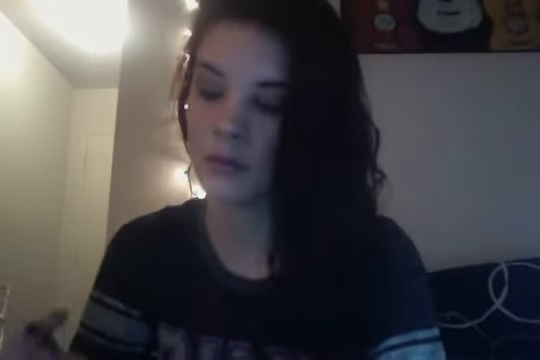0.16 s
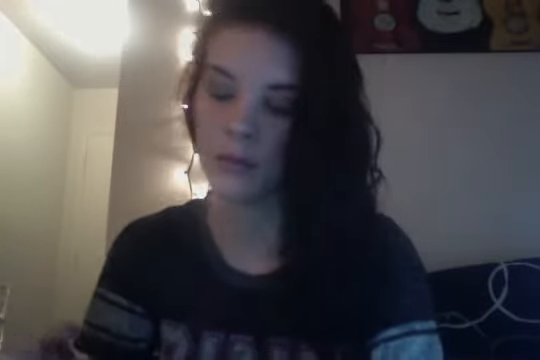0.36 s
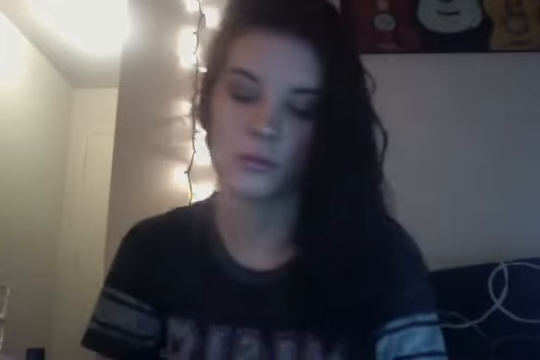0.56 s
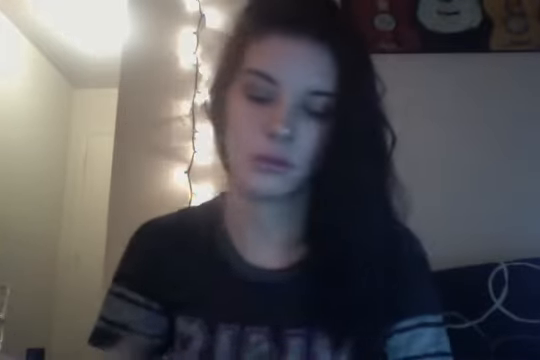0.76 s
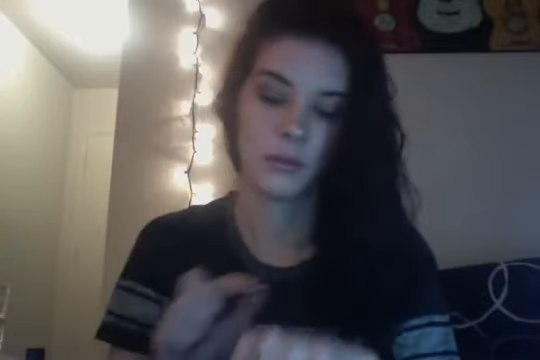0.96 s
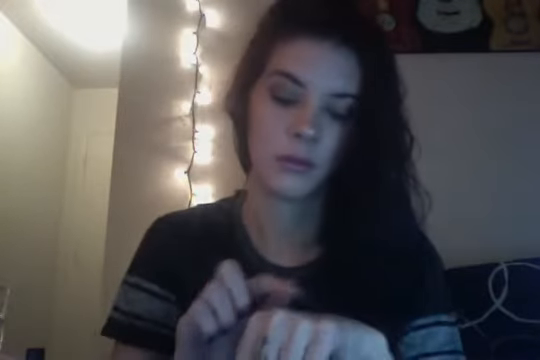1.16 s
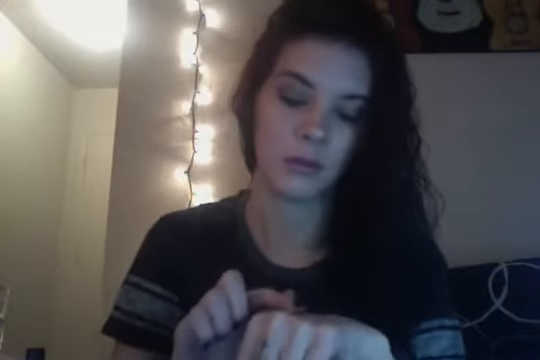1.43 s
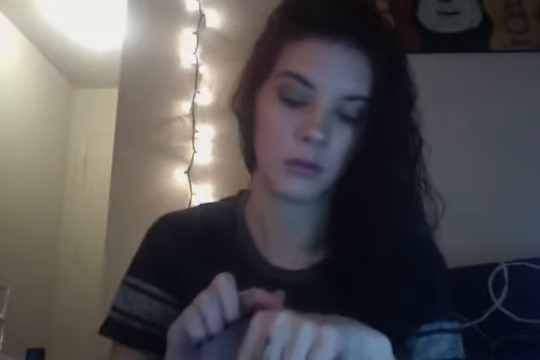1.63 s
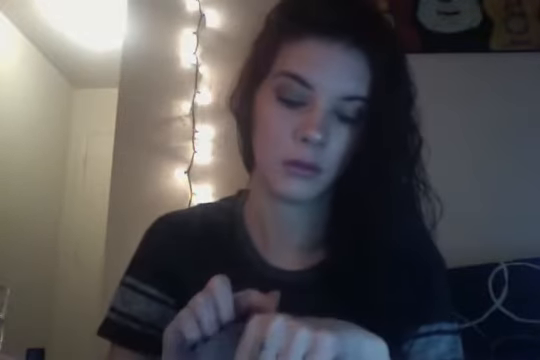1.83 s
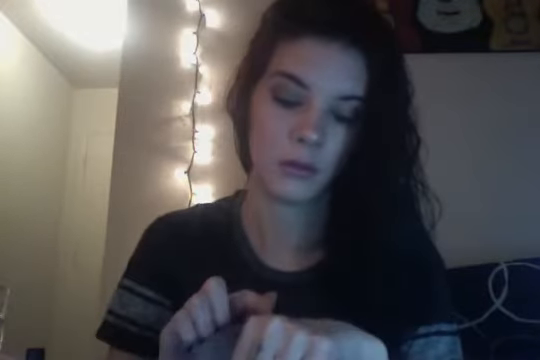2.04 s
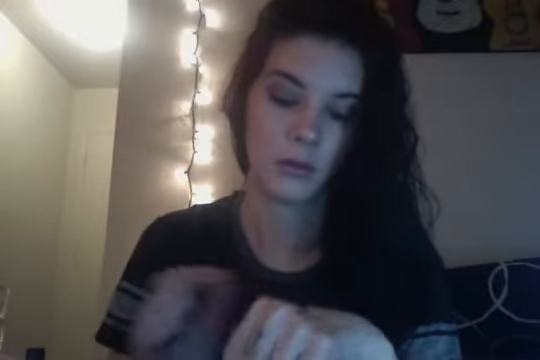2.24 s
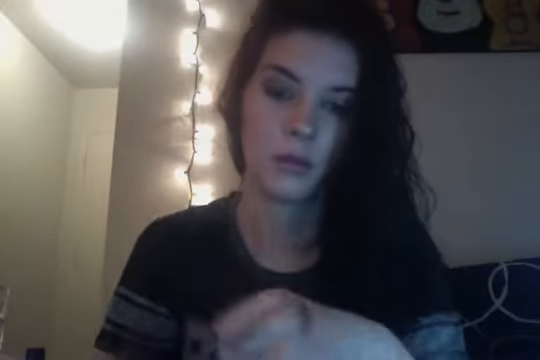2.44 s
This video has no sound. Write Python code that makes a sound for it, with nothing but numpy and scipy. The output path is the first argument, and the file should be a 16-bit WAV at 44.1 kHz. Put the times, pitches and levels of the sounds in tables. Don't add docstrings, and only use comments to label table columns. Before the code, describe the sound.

A plastic make-up palette is put down with a sharp clack and rattle, then snaps shut

```python
import sys
import numpy as np
from scipy import signal
from scipy.fft import rfft, irfft
from scipy.io import wavfile
from scipy.ndimage import uniform_filter1d

SR = 44100
rng = np.random.default_rng(int(sys.argv[2]) if len(sys.argv) > 2 else 0)


def ratio_of_db(decibels):
    return 10 ** (np.asarray(decibels, float) / 20)


def wav_record(signal):
    frames = np.transpose(np.atleast_2d(signal))
    bounded = np.clip(frames, -1, 1)
    quanta = np.round(bounded * 32767).astype(np.int16)
    wavfile.write(sys.argv[1], SR, quanta)


N = 114660

# (time [s], rate [Hz])
BLADE_RATE = [
    (0.0, 1424),
    (0.19, 1449),
    (1.12, 1453),
    (2.6, 1473),
]
FAN_TONES = {3: -78.5, 4: -85, 8: -79.5, 9: -79, 10: -85, 11: -83.5, 14: -89.5, 18: -88.5, 19: -78, 38: -85,
             57: -102}
# (frequency [Hz], level per Hz [dB])
AIR_COLOUR = [(45, -30), (90, -7), (650, 0), (1600, -7), (4000, -14), (4800, -24), (7000, -28.5),
              (16000, -45.5)]
BUZZ_TONES = {3: -104, 5: -92.5, 7: -101, 9: -106, 10: -101, 11: -96.5, 12: -102, 13: -100, 14: -91, 15:
              -102, 16: -107, 17: -104, 18: -101, 20: -107, 21: -118}
# (centre [Hz], width [Hz], level [dB])
SIZZLE = [(2270, 340, -87), (6000, 600, -97), (7700, 630, -96.5), (8350, 250, -99), (8850, 300, -97)]
# (time [s], level [dB], length [s])
BLIPS = [
    (1.16, -80, 0.018),
    (1.287, -84, .012),
    (2.28, -85, .015),
]

DROP = [(.2047, -49, -42, -70, 3.6), (.2074, -18.5, -4.5, -7, 0.69), (.2085, -11, -14.5, -25, 1.6),
        (.2213, -26, -13, -23.5, 1.3), (.2226, -15, -16.5, -27.5, 1.46), (.2310, -33.5, -19, -23, 1),
        (.2330, -21, -22.5, -34.5, 2.2), (.2350, -25, -23, -40, 1.5), (.2420, -30, -33.5, -41, 2.5),
        (.2465, -28.5, -35.5, -45.5, 3.0), (.2515, -33, -38, -44.5, 2.0), (.2590, -31, -40, -48, 2.24),
        (.2705, -37, -51, -54, 2.8), (.2755, -49, -39, -54, 1.9), (.2810, -44, -45, -59, 2.67),
        (.2960, -41, -46, -58, 2.94), (.3080, -48, -49, -54, 2.94), (.3200, -56, -50, -55, 2.83)]
RATTLE = [
    (.2183, -44.5, -35.5, -22.5, 2.7),
    (.2568, -40.5, -30.5, -37.5, 2.6),
    (.2632, -50, -48, -36.5, 2.1),
    (.2644, -46.5, -31, -24, 3.0),
    (.2880, -50, -41, -36.5, 3.41),
]
TICK = [
    (.3580, -47, -49.5, -57, 2.4),
    (.3598, -35.5, -32.5, -56, 2.22),
    (.3770, -60, -52, -60, 5.2),
    (.3900, -60.5, -57, -69, 5.7),
]
SNAP = [
    (.5195, -23, -21.5, -21, 0.96),
    (.5210, -19, -23, -36, 1.12),
    (.5255, -47, -32, -48, 1.14),
    (.5298, -43, -31, -47, 1.6),
    (.5325, -24, -36, -42, 2.4),
    (.5420, -46, -47, -56, 2.9),
    (.5700, -34.5, -54, -65, 3.1),
    (.5850, -49, -58, -72, 3.9),
]
SETTLE = [
    (.5465, -41, -46, -60, 3.3),
    (.5565, -34, -39, -60, 3.15),
    (.5655, -38, -44.5, -46, 3.3),
    (.5800, -50, -60, -70, 2.7),
]

TRAY = [(310, -18, .03), (467, -7, .03), (567, -7.5, .022), (784, 7, 0.018), (1070, -14, .012)]
SHELL = [(1560, -11, .012), (1836, -6.5, 0.014), (2375, -5, .012), (2750, -9, 0.014), (3173, -6.5, .01),
         (3560, 0, .01), (4300, -4, 0.0079), (4600, -10.5, .007)]
CRACK = [(5850, -7.5, 0.0083), (7660, -3.5, .007), (8560, -4, 0.013), (9300, 4.5, .006), (10300, 0, .005),
         (11600, -4.5, 0.0074), (12600, -9, 0.006), (13600, -13.5, .004)]
PAN_SHELL = [(2000, -1, 0.016), (2650, -7.5, .008), (3470, -1, .01), (4900, -2, 0.0087)]
PAN_CRACK = [(5920, -5, .006), (6700, 2, 0.011), (8400, -5.5, .005), (10400, -0.5, .008),
             (11600, -2, 0.0081), (13300, -9, .004), (14800, -14.5, .003)]
TICK_TRAY = [(410, -4.5, 0.025), (570, 4.5, 0.0091), (720, 5, 0.012), (1000, -12, 0.014)]
TICK_SHELL = [(1870, -1.5, 0.016), (2270, -6.5, 0.015), (3200, -5.5, 0.015), (4640, -23, .025)]
TICK_CRACK = [(6030, 4, 0.015), (10800, 0, 0.019), (13500, -12, .012)]
LID_TRAY = [(250, -11, 0.036), (412, -5, 0.029), (473, -1.5, 0.017), (656, -8.5, 0.011), (810, -4.5, .015),
            (1030, -15, 0.016)]
LID_SHELL = [(1360, -4.5, 0.015), (1620, 3, 0.015), (2170, 2.5, 0.013), (2630, -10.5, 0.0076),
             (3240, -9.5, 0.01), (3870, -8, 0.0042), (4620, -7.5, 0.011)]
LID_CRACK = [(5900, -0.5, 0.011), (6610, 1.5, 0.0094), (7600, -3, 0.0055), (8280, -1.5, 0.0055),
             (9450, -14, 0.0025), (11200, -6, 0.0044), (12300, -9, .003), (14200, -11, .003)]

GRIT_SHARE = (0.055, 0.12, 0.45)
# (centre [Hz], width [Hz])
CLACK_BANDS = [(600, 500), (3200, 3000), (6000, 5700)]
# (tray, shell, edges) [dB]
CLACK_DB = (-29.5, -11, -5.5)
# (frequency [Hz], level [dB], time to fall 60 dB [s])
ROOM = [(113, -31, 0.19), (309.7, -27, 0.11), (800, -27, .2), (1520, -22.5, .2), (3006, -24, .2),
        (5660, -19.5, .21), (11000, -20, .18)]
# (time [s], gain [dB])
SUPPRESSOR = [
    (0, 0.5),
    (.2, 0),
    (0.239, 8),
    (.6, 7),
    (.95, 3.5),
    (1.2, -0.36),
    (2.6, 0.5),
]

BLADES = 19
FAN_WOBBLE_DB, FAN_WOBBLE_RATE, FAN_DRIFT = 2.5, 22, .0007
AIR_DB, AIR_FLICKER_DB = -69.5, 1
BUZZ_HZ, CLOCK_HZ, MAINS_HZ = 567.45, 8000, 120
CLOCK_DB, CLOCK_FLUTTER_DB, MAINS_DB = -91.5, 8.5, -87
SKIRT_DB, SKIRT_HZ = -102, 79.67
CLOCK_FADE_S, CLOCK_FADE_DB = 2.4, -14
SIZZLE_PATCH_DB = 3
SCATTER_DB, SCATTER_TUNE, SCATTER_PHASE = 2.5, 0.014, .35
STRIKE_SAMPLES = 4096
ROOM_GAP_S = 0.006
BODY_CUT_HZ, BODY_TOP_HZ = 220, 14000
LOW_CUT_HZ, TOP_HZ = 87, 15900


def band(x, hz, width):
    return signal.lfilter(*signal.iirpeak(min(hz, .45 * SR), hz / width, fs=SR), x)


def double_band(x, hz, width):
    return band(band(x, hz, width), hz, width)


def level(x, db):
    return x * ratio_of_db(db) / np.sqrt(np.mean(x ** 2))


def peak(x, db=0):
    return x * ratio_of_db(db) / np.abs(x).max()


def walk(rate):
    hold = int(SR / rate)
    steps = np.repeat(rng.standard_normal(64), hold)[:N + hold]
    smooth = uniform_filter1d(uniform_filter1d(steps, hold), hold)
    return 1.17 * smooth[:N]


def fan():
    t = np.arange(N) / SR
    shaft_hz = np.interp(t, *np.array(BLADE_RATE).T) / BLADES * (1 + FAN_DRIFT * walk(24))
    turns = np.cumsum(shaft_hz) / SR
    tones = 0
    for multiple, db in FAN_TONES.items():
        wobble = ratio_of_db(FAN_WOBBLE_DB * walk(FAN_WOBBLE_RATE))
        tone = np.sin(2 * np.pi * (multiple * turns + rng.random()))
        tones = tones + level(wobble * tone, db)

    hz, db = np.array(AIR_COLOUR).T
    f = np.fft.rfftfreq(N, 1 / SR) + 1
    colour = ratio_of_db(np.interp(np.log(f), np.log(hz), db))
    air = 0
    for centre in 2 ** np.arange(5.5, 14.5):
        share = np.cos(np.pi / 2 * np.clip(np.log2(f / centre), -1, 1))
        octave = irfft(rfft(rng.standard_normal(N)) * colour * share, N)
        air = air + ratio_of_db(AIR_FLICKER_DB * walk(8.3)) * octave
    return tones + level(air, AIR_DB)


def circuit_tone(hz, db, flutter_db=1.5):
    t = np.arange(N) / SR
    tone = np.sin(2 * np.pi * (hz * t + rng.random()))
    return level(ratio_of_db(flutter_db * walk(24)) * tone, db)


def circuits():
    t = np.arange(N) / SR
    buzz = sum(circuit_tone(multiple * BUZZ_HZ, db) for multiple, db in BUZZ_TONES.items())
    whine = circuit_tone(CLOCK_HZ, CLOCK_DB, CLOCK_FLUTTER_DB)
    skirt = level(band(rng.standard_normal(N), CLOCK_HZ, SKIRT_HZ), SKIRT_DB)
    fade = ratio_of_db(CLOCK_FADE_DB * np.clip((t - CLOCK_FADE_S) * 10, 0, 1))
    clock = (whine + skirt) * fade
    sizzle = 0
    for hz, width, db in SIZZLE:
        hiss = double_band(rng.standard_normal(N), hz, width)
        sizzle = sizzle + level(ratio_of_db(SIZZLE_PATCH_DB * walk(22)) * hiss, db)
    burst = level(double_band(rng.standard_normal(N), 8550, 700), 0)
    swells = sum(ratio_of_db(db) * np.exp(-((t - when) / (length / 2)) ** 2) for when, db, length in BLIPS)
    return buzz + clock + sizzle + swells * burst + circuit_tone(MAINS_HZ, MAINS_DB)


def ring_part(modes, push, grit, ms, rough):
    t = np.arange(STRIKE_SAMPLES) / SR
    clean = scrape = 0
    for hz, db, t60 in modes:
        louder, higher, shift = rng.standard_normal(3)
        turn = 2j * np.pi * hz * (1 + SCATTER_TUNE * higher)
        fade = 1000. ** (-1 / t60 / SR)
        swell = signal.lfilter([1], [1, -fade], push)
        wave = np.exp(turn * (t - ms / 2 / 1000) + 1j * SCATTER_PHASE * shift).real
        clean = clean + ratio_of_db(db + SCATTER_DB * louder) * swell * wave
        scrape = scrape + ratio_of_db(db) * signal.lfilter([1], [1, -fade * np.exp(turn / SR)], grit).imag
    return (1 - rough) * peak(clean) + rough * peak(scrape)


def knocks(contacts, *parts, soft_db=0):
    out = np.zeros((2, N))
    t = np.arange(STRIKE_SAMPLES) / SR
    for when, *dbs, ms in contacts:
        push = np.sin(np.pi * np.clip(t / (ms / 1000), 0, 1)) ** 2
        grit = push * rng.standard_normal(STRIKE_SAMPLES)
        start = int(when * SR)
        for i, (modes, db) in enumerate(zip(parts, dbs)):
            ring = peak(ring_part(modes, push, grit, ms, GRIT_SHARE[i]), db)
            clack = double_band(grit, *CLACK_BANDS[i])
            clack = ratio_of_db(soft_db) * clack * np.sqrt(np.sum(ring ** 2) / np.sum(clack ** 2))
            direct = ring + ratio_of_db(CLACK_DB[i]) * clack
            to_room = ring if i == 0 else clack
            out[:, start:start + STRIKE_SAMPLES] += [direct, to_room]
    return out


def room(x):
    t = np.arange(SR // 2) / SR
    tail = 0
    for hz, db, t60 in ROOM:
        noise = double_band(rng.standard_normal(len(t)), hz, hz)
        first_echo = np.clip(t / ROOM_GAP_S - 1, 0, 1)
        part = noise * 1000. ** (-t / t60) * first_echo
        tail = tail + ratio_of_db(db) * part / np.sqrt(np.sum(part ** 2))
    return signal.fftconvolve(x, tail)[:N]


def scene():
    gain = ratio_of_db(np.interp(np.arange(N) / SR, *np.array(SUPPRESSOR).T))
    laptop = gain * (fan() + circuits())

    hits = knocks(DROP, TRAY, SHELL, CRACK)
    hits += knocks(RATTLE, TRAY, PAN_SHELL, PAN_CRACK)
    hits += knocks(TICK, TICK_TRAY, TICK_SHELL, TICK_CRACK, soft_db=-8)
    hits += knocks(SNAP, LID_TRAY, LID_SHELL, LID_CRACK)
    hits += knocks(SETTLE, TRAY, LID_SHELL, LID_CRACK)
    direct, spread = signal.sosfilt(signal.butter(5, BODY_TOP_HZ, fs=SR, output="sos"), hits)
    direct = signal.sosfilt(signal.butter(3, BODY_CUT_HZ, "high", fs=SR, output="sos"), direct)
    return (direct + room(spread) + laptop)[None]


def roll_off(x):
    return signal.sosfilt(signal.butter(12, 16540, fs=SR, output="sos"), x)


def record(dry):
    no_bass = signal.sosfilt(signal.butter(2, LOW_CUT_HZ, "high", fs=SR, output="sos"), dry)
    mix = signal.sosfilt(signal.ellip(8, .2, 70, TOP_HZ, fs=SR, output="sos"), no_bass)
    return roll_off(mix)


dry = scene()
out = record(dry)
wav_record(out)
```